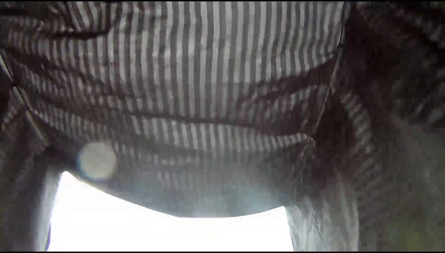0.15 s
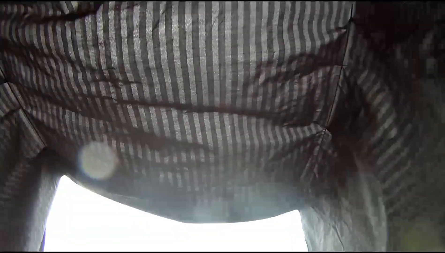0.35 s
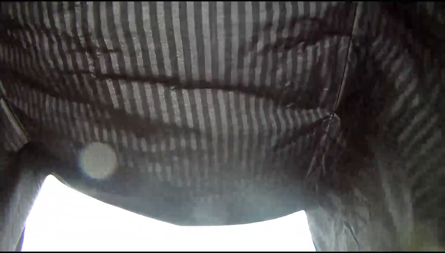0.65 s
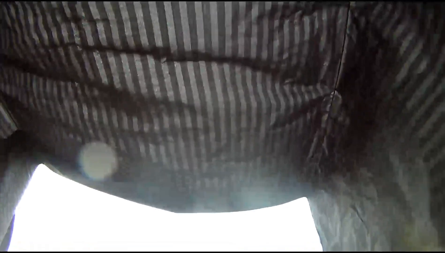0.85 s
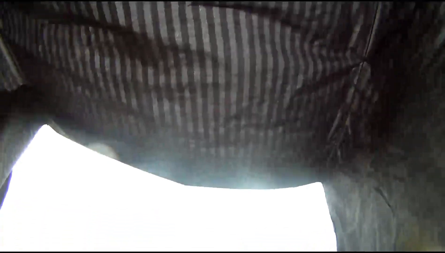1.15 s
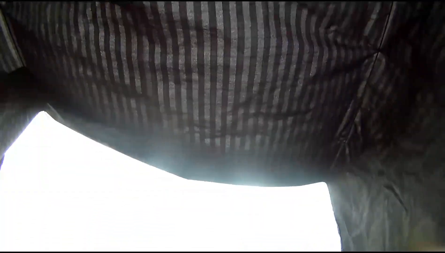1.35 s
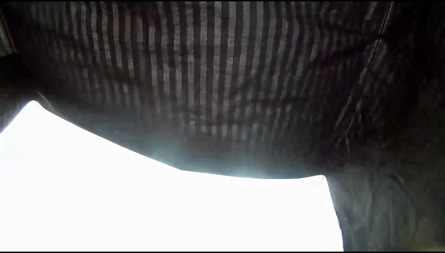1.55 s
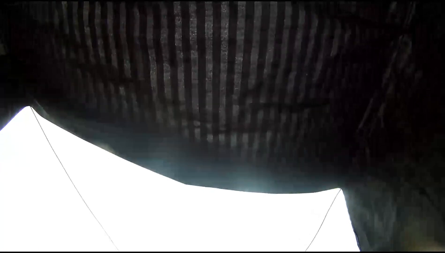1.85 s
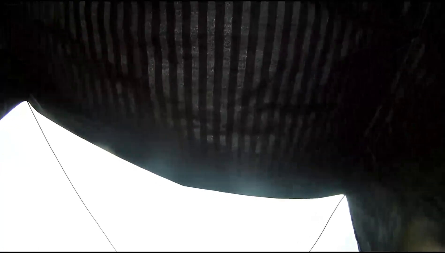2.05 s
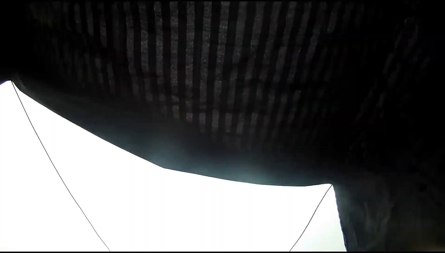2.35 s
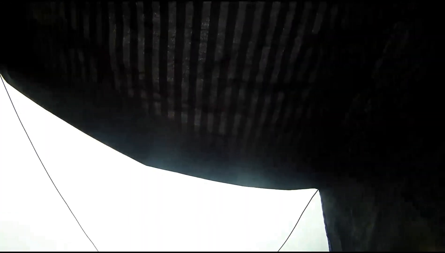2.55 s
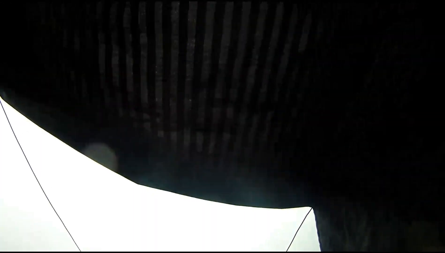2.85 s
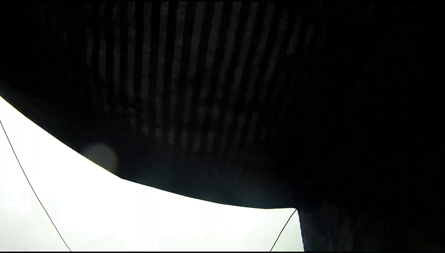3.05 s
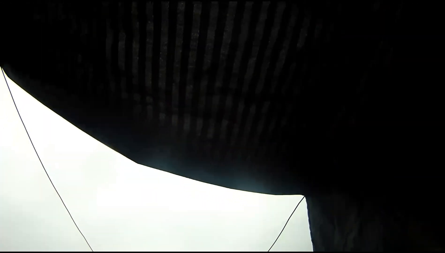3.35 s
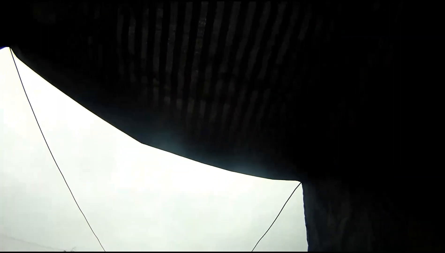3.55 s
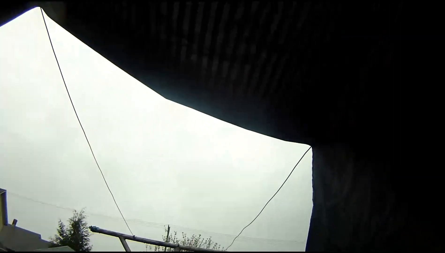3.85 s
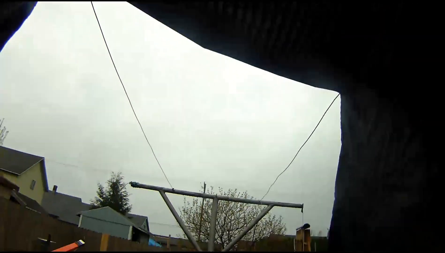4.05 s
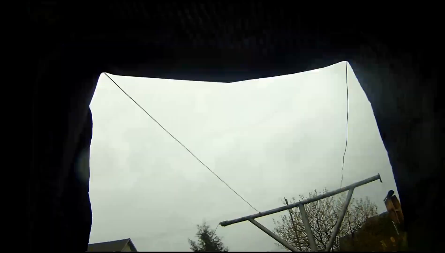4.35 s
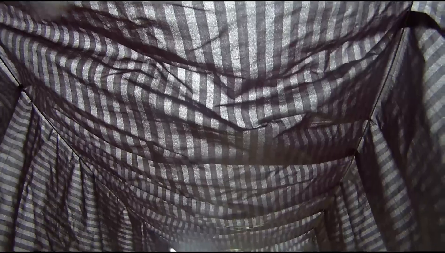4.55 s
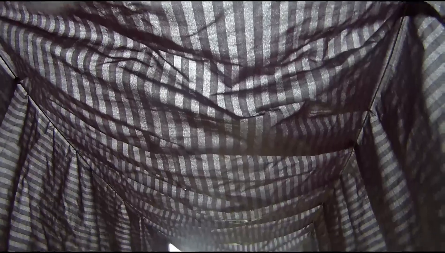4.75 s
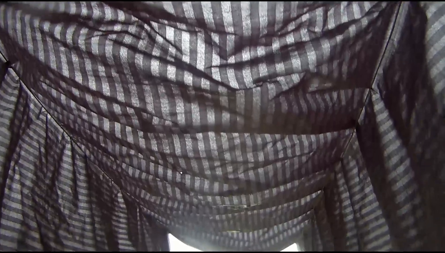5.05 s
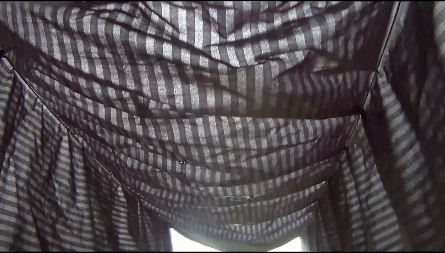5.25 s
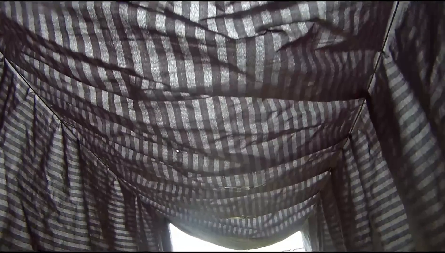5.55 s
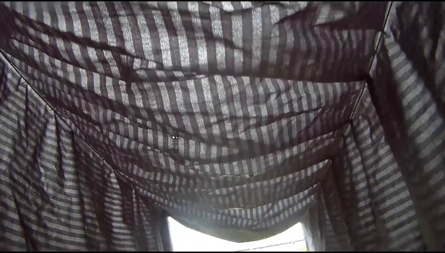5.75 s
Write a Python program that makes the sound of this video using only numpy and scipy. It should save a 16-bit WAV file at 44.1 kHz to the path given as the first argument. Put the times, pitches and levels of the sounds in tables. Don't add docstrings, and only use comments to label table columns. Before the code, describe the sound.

Steady rain patters on a fabric tarp overhead, with close ticking drips, faint traffic rumble, and one sharp plasticky snap midway.

```python
import sys
import numpy as np
from scipy import signal
from scipy.fft import rfft, irfft
from scipy.io import wavfile

SR = 44100
rng = np.random.default_rng(int(sys.argv[2]) if len(sys.argv) > 2 else 0)


def decibels_to_gain(level_db):
    exponent = np.asarray(level_db, float) / 20
    return 10 ** exponent


def bounce(signal):
    frames = np.transpose(np.atleast_2d(signal))
    limited = np.clip(frames, -1, 1)
    pcm = np.round(limited * 32767).astype(np.int16)
    wavfile.write(sys.argv[1], SR, pcm)


N = 260631


def rms_one(x):
    return x / np.sqrt(np.mean(x ** 2) + 1e-20)


def in_time(rows):
    s, *columns = np.transpose(rows)
    return [np.interp(np.arange(N) / SR, s, c) for c in columns]


def drift(rate):
    r = np.exp(-80 * np.pi * rate / SR)
    slow = signal.lfilter([1], [1, -2 * r, r * r], rng.standard_normal(N // 40 + 2002))[2000:]
    return np.interp(np.arange(N) / 40, np.arange(len(slow)), rms_one(slow))


def ring(clicks, hz, t60):
    r, w = decibels_to_gain(-60 / (t60 * SR)), 2 * np.pi * hz / SR
    return signal.lfilter([0, np.sin(w)], [1, -2 * r * np.cos(w), r * r], clicks + 1e-18)


def click(s, size):
    return size * (np.arange(N) == round(s * SR))


def colour(x, points):
    hz, level_db = np.transpose(points)
    grid = np.maximum(np.fft.rfftfreq(4096, 1 / SR), 5)
    log_level = np.interp(np.log(grid), np.log(hz), level_db) * np.log(10) / 20
    cepstrum = irfft(log_level)
    cepstrum[1:2048] *= 2
    cepstrum[2049:] = 0
    impulse = irfft(np.exp(rfft(cepstrum)))
    return signal.fftconvolve(x, impulse)[:N]


def resonate(x, hz, width):
    r = np.exp(-np.pi * width / SR)
    b, a = [1, 0.0042, -0.98], [1, -2 * r * np.cos(2 * np.pi * hz / SR), r * r]
    return rms_one(signal.lfilter(b, a, signal.lfilter(b, a, x)))


# (frequency [Hz], level [dB])
RUMBLE = [(15, -29), (30, 4.5), (60, 8), (110, 4), (170, -3), (400, -41)]
# (frequency [Hz], level [dB rms])
HUMS = [(522, -72)]
# (time [s], pitch [Hz], level [dB rms])
ENGINE = [
    (5.0, 66.5, -90),
    (5.35, 66.5, -62),
    (5.55, 66.8, -51),
    (5.75, 66.5, -49),
    (5.91, 66, -50),
]


def yard(rumble_db):
    t = np.arange(N) / SR
    swell_db = 1.2 * drift(4)
    rumble = decibels_to_gain(rumble_db + 7.0 + swell_db) * rms_one(colour(rng.standard_normal(N), RUMBLE))
    hz, engine_db = in_time(ENGINE)
    engine = np.sqrt(2) * decibels_to_gain(engine_db) * np.sin(2 * np.pi * np.cumsum(hz) / SR)
    hums = sum(np.sqrt(2) * decibels_to_gain(db + 4.0 * drift(2.5)) * np.sin(2 * np.pi * hz * t) for hz, db in HUMS)
    return rumble + engine + hums


# (time [s], level [dB rms])
SWISH = [
    (5.675, -80),
    (5.69, -44.5),
    (5.72, -45.5),
    (5.76, -49),
    (5.82, -75),
]


def swish():
    grain_db = 4.8 * rng.standard_normal(N) + 1.6 * drift(88.9)
    grains = rng.standard_normal(N) * decibels_to_gain(grain_db)
    bright = signal.sosfilt(signal.butter(1, [2500, 9000], "band", fs=SR, output="sos"), grains)
    return decibels_to_gain(in_time(SWISH)[0]) * rms_one(bright)


# (time [s], peak level [dB], rise [s], hold [s], fall [s])
STROKES = [
    (3.025, -36, 0.013, 0.00058, 0.0082),
    (3.0578, -32, .005, 0.0062, 0.01),
    (3.110, -38, .004, .007, .006),
    (3.229, -45, 0.0052, .001, .011),
    (4.427, -50.5, .01, 0.012, .002),
    (4.489, -49.5, .012, 0.01204, 0.0603),
]
# (time [s], peak level [dB], rise [s], hold [s], fall [s])
SLIDES = [
    (3.161, -34, .003, .003, .014),
    (3.1730, -25, .0015, .001, .003),
    (3.1746, -15, .002, .0012, .003),
    (3.1775, -20, .003, .006, .012),
    (3.1916, -12, .003, .002, .002),
    (3.1942, -21, .002, .001, .007),
]


def strokes():
    t = np.arange(N) / SR
    loudness = np.zeros(N)
    for s, db, rise, hold, fall in STROKES + SLIDES:
        outside = np.clip(np.maximum((s - t) / rise, (t - s - hold) / fall), 0, 4)
        loudness += decibels_to_gain(db - 30 * outside) * (abs(t - s) < .5)
    return loudness


# (frequency [Hz], width [Hz], level [dB])
HOUSING = [(950.6, 1010, -10), (1740, 240, -11.5), (3100, 820, -6), (4820, 950, 1.5), (6970, 1100, -1),
           (8160, 1100, -21), (11500, 4200, -16.5), (15075, 1200, -22.5)]


def rubbing():
    grit = rng.standard_normal(N) * decibels_to_gain(0.86 * rng.standard_normal(N))
    body = sum(decibels_to_gain(db) * resonate(grit, hz, width) for hz, width, db in HOUSING)
    return strokes() * rms_one(body)


# (time [s], peak level [dB], frequency [Hz], fade by 60 dB [s], sign and size)
PUSHES = [
    (3.07, -35, 40, 0.13, -1),
    (3.12, -34.5, 45, 0.1, -1.1),
    (3.1736, -14, 700, .003, 0.97),
    (3.1743, -3, 1010, 0.0049, -1.11),
    (3.1760, -16, 91.8, 0.064, 0.92),
    (3.188, -20.5, 60, .05, 0.9),
    (3.19, -3.5, 447, 0.0041, 1),
    (3.1750, -19.5, 170.8, 0.063, 0.81),
    (3.1914, -11, 170, 0.019, -0.77),
    (3.1930, -26.5, 65, 0.19, -0.39),
]
# (time [s], level [dB], frequency [Hz], fade by 60 dB [s])
STRIKE = [
    (3.1914, 1, 5020, .009),
    (3.1914, 1, 6970, .009),
    (3.1920, -2, 5020, .007),
    (3.19211, -1, 6970, .007),
    (3.1925, -7, 3100, .006),
    (3.1938, -8, 1600, .004),
]
CATCH_S = 3.1937
# (frequency [Hz], level [dB], fade by 60 dB [s])
CATCH = [(2649, -38, .036), (3736, -16.5, .055), (6745, -30, .026), (8263, -22, .05)]


def catch_snap():
    out = sum(ring(click(s, sign * decibels_to_gain(db)), hz, t60) for s, db, hz, t60, sign in PUSHES)
    out += sum(ring(click(s, decibels_to_gain(db)), hz, t60) for s, db, hz, t60 in STRIKE)
    return out + sum(ring(click(CATCH_S, decibels_to_gain(db)), hz, t60) for hz, db, t60 in CATCH)


def splash(strength, decay_s):
    r = np.exp(-1 / (decay_s * SR))
    return signal.lfilter([1], [1, -r], strength + 1e-18) * rng.standard_normal(N)


def patter(level_db, per_s, spread_db, cycles, splash_db, hiss_db):
    sizes = decibels_to_gain(spread_db * np.minimum(rng.exponential(1, N), 2.6))
    sizes = sizes * (rng.random(N) < per_s * decibels_to_gain(2.5 * drift(14)) / SR)
    pitches = np.geomspace(500, 9000, 16)
    dealt = rng.integers(0, 16, N)
    signed = sizes * np.where(rng.random(N) < .7, 1, -1)
    rings = sum(ring(signed * (dealt == k), hz, cycles / hz) * hz ** .6 for k, hz in enumerate(pitches))
    ticks = rms_one(rings) + decibels_to_gain(-1.5) * rms_one(signed - signed.mean())
    spray = decibels_to_gain(splash_db) * rms_one(splash(sizes, decay_s=0.0045))
    hiss = decibels_to_gain(hiss_db + 2.0 * drift(36)) * rng.standard_normal(N)
    return decibels_to_gain(level_db) * rms_one(ticks + spray + hiss)


# (time [s], rate [drops per s])
GUSTS = [(0.0, 30.5), (0.7, 45.7), (1.0, 34.8), (1.3, 22.3), (1.7, 22), (2.0, 29), (2.3, 35.1),
         (2.65, 44.5), (3.0, 30), (3.3, 11.8), (3.7, 25), (4.0, 45), (4.4, 45), (4.55, 19.6), (4.85, 24.9),
         (5.1, 9.86), (5.5, 19.6), (5.91, 30)]
SCATTER_DB, SCATTER_SPREAD_DB, SCATTER_SPRAY_DB = -37.5, 2.5, -14


def scattered():
    crowd = np.cumsum(np.maximum(in_time(GUSTS)[0], 1)) / SR
    luck = rng.random((250, 4))
    arrivals = np.cumsum(.3 + 1.4 * luck[:, 0])
    s = np.interp(arrivals, crowd, np.arange(N) / SR)
    db = SCATTER_DB + 3.5 * SCATTER_SPREAD_DB * (luck[:, 1] - .5)
    hz = 950 * 4.5 ** luck[:, 2] ** .7
    spray_db = SCATTER_SPRAY_DB + 14 * (luck[:, 3] - .5)
    rows = np.c_[s, db, hz, spray_db]
    return [tuple(row) for row in rows[arrivals < crowd[-1]]]


# (time [s], peak level [dB], cloth ring [Hz], spray against peak [dB])
DROPS = [(0.1644, -23.5, 1070, -11), (0.2285, -31.5, 950, -4), (0.3404, -26, 3100, -11),
         (0.5363, -26.5, 2300, -12), (0.7695, -28.5, 4480, -25), (0.9283, -24, 4478, -20),
         (1.1557, -23, 3300, -12), (1.1767, -26.5, 3920, -19), (1.2459, -30.5, 1009, -19),
         (1.3266, -24, 3080, -15), (1.3749, -30, 3530, -9.5), (1.4618, -24, 3880, -14.5),
         (1.4903, -30, 4180, -11), (1.5922, -28.5, 2410, -14), (1.9794, -33, 715.4, -5.5),
         (2.0947, -30.5, 1300, -9), (2.1533, -29, 1477, -14), (2.5045, -28, 3790, -13.5),
         (2.848, -21, 4256, -13), (2.8582, -25.5, 2797, -32), (2.8734, -29.5, 1720, -12),
         (3.3473, -30, 3140, -11.5), (3.46, -28.5, 4610, -18), (3.5341, -28.5, 3388, -11.5),
         (3.7823, -25.5, 3056, -11), (3.811, -19.5, 3830, -18), (3.897, -25, 3570, -17),
         (3.973, -19.5, 4467, -19), (4.1179, -34, 726, -5.5), (5.8972, -28, 1170, -17)]
# (time [s], peak level [dB], cloth ring [Hz])
TAUT_DROPS = [(0.2133, -35, 3490), (0.4346, -34, 3230), (0.4461, -33.5, 3270), (0.7305, -34, 3100),
              (0.873, -30.5, 3270), (0.9573, -34.5, 3270), (1.1689, -32, 3400), (1.2705, -33, 3190),
              (1.5706, -30, 4500), (1.5997, -31.5, 3100), (1.642, -31, 3400), (1.6826, -28.5, 8050),
              (1.795, -32, 3622), (2.4644, -32, 3660), (2.4803, -29.5, 3270), (2.5444, -29, 3786),
              (2.723, -31, 3534), (3.0318, -27.5, 2710), (3.0423, -29.5, 3180), (3.8201, -31, 3965),
              (3.8529, -33, 4090), (3.8878, -28.5, 3360), (4.2444, -32.5, 3703), (4.3287, -32, 3490),
              (4.357, -30, 2890), (4.6747, -34, 4690), (5.3172, -34.5, 4576), (5.472, -31, 2930),
              (5.5277, -34, 3680), (5.7409, -28.5, 4525)]
# (time [s], peak level [dB], cloth ring [Hz])
SLACK_DROPS = [(0.0292, -31, 2330), (0.2016, -34, 2370), (0.2536, -34, 1290), (0.3689, -31.5, 2150),
               (0.3773, -31, 1640), (0.427, -34, 1720), (0.5058, -43, 730), (0.747, -34.5, 1030),
               (0.8196, -33, 1420), (1.503, -32.5, 1340), (1.6596, -33.5, 1380), (1.8563, -35, 1080),
               (1.8862, -40, 1980), (2.8134, -34, 895), (2.9, -29.5, 2150), (2.9285, -31.5, 1640),
               (3.108, -30.5, 1940), (3.1575, -31, 730), (3.3001, -34, 2020), (3.609, -37.5, 1034),
               (3.6599, -31.5, 2150), (3.7153, -32, 2450), (3.9501, -31, 988), (4.3846, -31, 1640),
               (4.7314, -32.5, 1380), (4.7622, -37, 1461), (5.0885, -37, 1040), (5.114, -31, 1598),
               (5.1927, -39, 776), (5.6424, -34.5, 1030)]
TAUT_SPRAY_DB, SLACK_SPRAY_DB = -13, -11.5


def near_drops(cycles, rebound_db):
    rows = DROPS + [row + (TAUT_SPRAY_DB,) for row in TAUT_DROPS]
    rows = rows + [row + (SLACK_SPRAY_DB,) for row in SLACK_DROPS] + scattered()
    out, t = np.zeros(N + 2000), np.arange(900) / SR
    luck = rng.random((len(rows), 2))
    spray = np.clip(rng.laplace(size=(len(rows), 900)) ** 3 / 8, -3, 3)
    swell, fade = 1 - np.exp(-t / 0.00029), np.exp(-t / 0.0022) + 0.15 * np.exp(-t / 0.011)
    tail = swell * fade
    for (s, db, hz, spray_db), (wait, soft), droplets in zip(rows, luck, spray):
        at = round(s * SR)
        ring_s = cycles * (hz / 3000) ** -0.1 / hz
        tone = np.cos(2 * np.pi * hz * t) * decibels_to_gain(-60 * t / ring_s)
        thud_db = -9 - 2.4 * np.log2(hz / 1000)
        thud = decibels_to_gain(thud_db) * np.sin(2 * np.pi * 500 * t) * decibels_to_gain(-60 * t / 0.0033)
        hit = decibels_to_gain(db + 2.5) * (.95 * tone + .8 * thud + .85 * (t == 0))
        out[at:at + 900] += hit + decibels_to_gain(db + spray_db + 6.0) * tail * droplets
        late = at + round((.0008 + 0.0023 * wait) * SR)
        out[late:late + 900] += decibels_to_gain(rebound_db + spray_db / 2 - 15.0 * soft) * hit
    return out[:N]


# (frequency [Hz], level [dB])
CLOTH = [(60, -4.5), (200, 2.5), (600, 2), (1500, 2), (3300, 1), (5000, 1), (8000, -1.5), (11000, -10),
         (15200, -11.5), (15800, -46)]


def through_cloth(x):
    return colour(x, CLOTH)


# (frequency [Hz], width [Hz], depth [dB])
PORT_NOTCHES = [(5960, 2150, -9), (6010, 1400, -9.5), (11930, 2140, -20)]


def port(x):
    for hz, width, depth_db in PORT_NOTCHES:
        w = 2 * np.pi * hz / SR
        pole = np.tan(np.pi * width / SR)
        zero = pole * decibels_to_gain(depth_db)
        b, a = [1 + zero, -2 * np.cos(w), 1 - zero], [1 + pole, -2 * np.cos(w), 1 - pole]
        x = signal.lfilter(b, a, x)
    return x


# (time [s], patter level [dB], rumble level [dB])
RAIN = [(0.0, -51, -61.5), (0.77, -48, -62.5), (1.2, -51, -62), (2.4, -50, -62), (2.88, -49.5, -58),
        (3.5, -50.5, -59.5), (4.35, -50, -57.5), (4.5, -51, -60.5), (4.9, -50.5, -62), (5.91, -49, -60)]


def scene():
    patter_db, rumble_db = in_time(RAIN)
    rain = patter(patter_db, per_s=800, spread_db=4.5, cycles=3.5, splash_db=-3, hiss_db=-1)
    rain = through_cloth(rain + near_drops(cycles=3.62, rebound_db=-3.0) + swish())
    handling = rubbing() + catch_snap()
    return (port(rain + handling) + yard(rumble_db))[None]


# (time [s], gain [dB])
GAP = [
    (4.4418, 0),
    (4.4428, -30),
    (4.452, -50),
    (4.468, -52),
    (4.470, -38),
    (4.479, -30),
    (4.488, 0),
]
# time [s], frequency [Hz], level [dB], fade by 60 dB [s]
GAP_RING = (4.442, 2150, -66, .2)
# from [s], to [s], low edge [Hz], high edge [Hz], level [dB rms]
GAP_LEAK = (4.469, 4.484, 2000, 4500, -67)


def brief_gap(dry):
    s, hz, db, t60 = GAP_RING
    thin = ring(click(s, decibels_to_gain(db)), hz, t60) * (np.arange(N) < 4.47 * SR)
    start, stop, low, high, leak_db = GAP_LEAK
    leak = signal.sosfilt(signal.butter(4, [low, high], "band", fs=SR, output="sos"), rng.standard_normal(N))
    is_open = abs(np.arange(N) / SR - (start + stop) / 2) < (stop - start) / 2
    thin += decibels_to_gain(leak_db) * rms_one(leak) * is_open
    return dry * decibels_to_gain(in_time(GAP)[0]) + thin


def band_limit(x):
    return signal.sosfilt(signal.butter(12, 15700, fs=SR, output="sos"), x)


def record(dry):
    clipped = np.clip(brief_gap(dry), -1, 1)
    top_cut = signal.butter(8, 16500, fs=SR, output="sos")
    mix = signal.sosfilt(top_cut, clipped)
    return band_limit(mix)


dry = scene()
out = record(dry)
bounce(out)
```